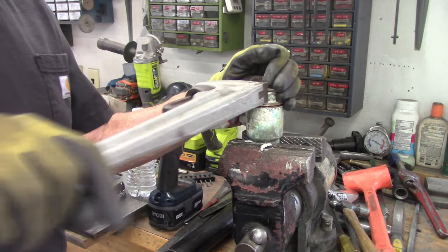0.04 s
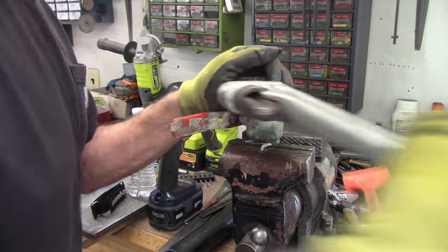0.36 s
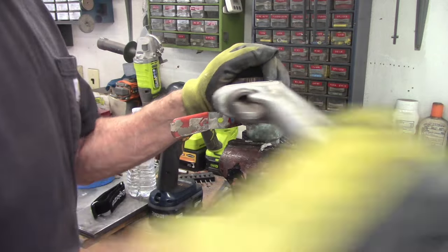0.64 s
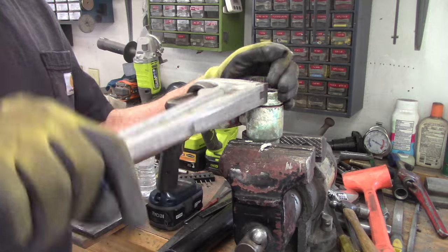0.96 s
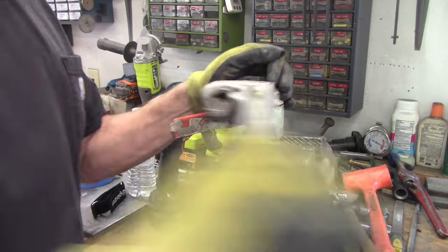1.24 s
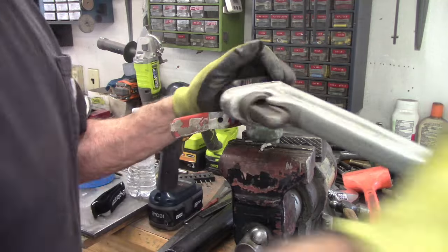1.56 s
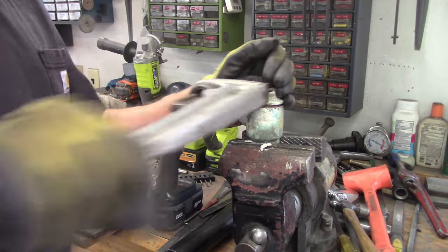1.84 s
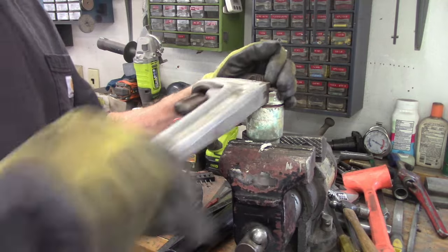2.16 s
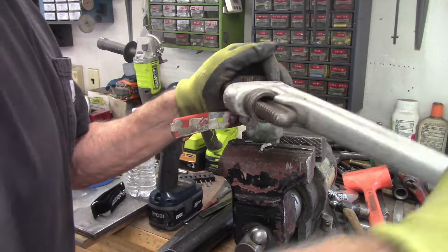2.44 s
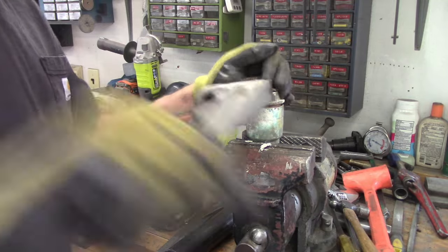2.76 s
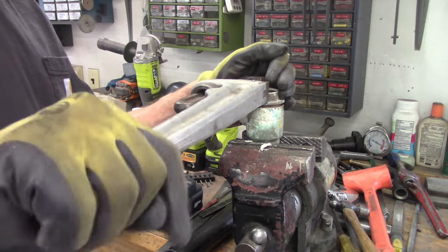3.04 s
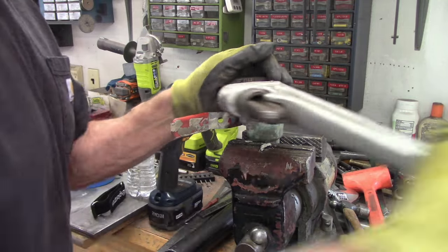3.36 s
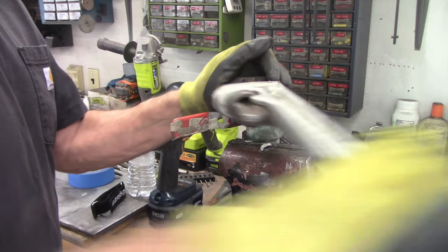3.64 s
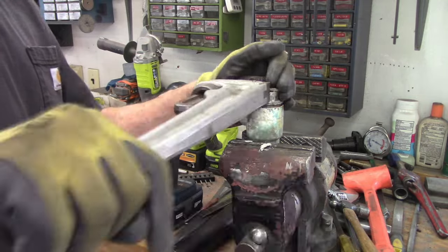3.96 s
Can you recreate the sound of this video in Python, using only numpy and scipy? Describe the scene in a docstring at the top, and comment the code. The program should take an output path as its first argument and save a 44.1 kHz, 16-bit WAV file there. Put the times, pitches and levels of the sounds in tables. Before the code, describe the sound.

A big pipe wrench clanks and rattles on a fitting in a vise, close by. Short grinds lead into clusters of steel clicks, scrapes and bench thuds at about 0.6, 1.7, 2.6 and 3.7 seconds, the second being the loudest. Lighter knocks fall near 0.1, 1.1, 2 and 3 seconds. A sleeve rustles faintly between strokes, and the workshop rings briefly over low room noise.

```python
"""A short grind and a clank, close to the microphone: a big pipe wrench is swung to and fro on a
fitting clamped in a bench vise. At each turn of the stroke its loose jaw clatters: steel clicks,
the vise clanks and the bench thuds just after. Between the blows the fitting grinds and a sleeve
rustles. The workshop rings on behind a closely spaced stereo pair, and a limiter holds the peaks."""
import sys
import numpy as np
from scipy import signal
from scipy.fft import rfft, irfft, next_fast_len
from scipy.io import wavfile
from scipy.ndimage import uniform_filter1d, minimum_filter1d, map_coordinates

SR = 44100
rng = np.random.default_rng(int(sys.argv[2]) if len(sys.argv) > 2 else 0)


def master_out(mix):
    """Clip the mix to full scale and print it as 16-bit PCM to the path in sys.argv[1]."""
    frames = np.transpose(np.atleast_2d(mix))
    ceiling = np.clip(frames, -1, 1)
    pcm = np.round(ceiling * 32767).astype(np.int16)
    wavfile.write(sys.argv[1], SR, pcm)


N = 176400


def amp(db):
    """Decibels to gain."""
    return 10 ** (np.asarray(db) / 20)


def unit(x):
    """Scaled to rms 1."""
    return x / np.sqrt(np.mean(x ** 2) + 1e-20)


def along(points, hz):
    """A curve of (freq_hz, value) points, read on a log frequency axis."""
    freqs, values = np.transpose(points)
    return np.interp(np.log(hz + 1), np.log(freqs + 1), values)


def peak(f, hz, width):
    """Complex response at f of one resonance centred on hz."""
    return 1j * f * width / (hz * hz - f * f + 1j * f * width)


def filtered(x, response):
    """x through a filter given as a function of frequency."""
    n = x.shape[-1]
    padded = next_fast_len(n + n // 4, real=True)
    return irfft(rfft(x, padded) * response(np.fft.rfftfreq(padded, 1 / SR)), padded)[..., :n]


def noise(spectrum):
    """Coloured noise of rms 1."""
    return unit(filtered(rng.standard_normal(N), lambda hz: amp(along(spectrum, hz))))


def wobble(rate):
    """A smooth random curve, rate knots a second."""
    return map_coordinates(rng.standard_normal(int(N * rate / SR) + 4), [np.arange(N) * rate / SR])


def placed(times, levels_db, sounds):
    """One sound at each time and level."""
    out = np.zeros(N + 2 * SR)
    for start_s, db, sound in zip(times, levels_db, sounds):
        out[max(round(start_s * SR), 0):][:len(sound)] += amp(db) * sound
    return out[:N]


# room tone of the workshop: freq_hz, relative_db
ROOM_TONE = [(25, -34), (60, -10), (120, -1), (220, 5), (400, 2.5), (1000, 5), (1500, -4), (2500, -13.5),
             (6000, -25.5), (10000, -32.5), (16000, -40)]
def room_tone(level_db=-42.5):
    """A steady, low wash of noise behind the work."""
    return amp(level_db) * noise(ROOM_TONE)


# decay of the room: freq_hz, t60_s
ROOM_DECAY = [(100, 0.55), (350, 0.78), (1000, 0.61), (2000, 0.99), (4000, 0.7), (7000, 0.5), (12000, 0.1)]
# colour of its long tail: freq_hz, relative_db
ROOM_COLOUR = [(100, -1), (350, 3), (1000, -0.5), (2000, -8.5), (4000, -8), (7000, -15.5), (12000, -9.5)]
def workshop(x, segments=24, near_db=-6, near_t60_s=0.12):
    """Quick scatter off nearby tools and walls, then a long tail, drawn afresh for each short
    stretch of time."""
    out = np.zeros(N + 2 * SR)
    size = N // segments + 1
    for start in range(0, N, size):
        hz, t, hiss = signal.stft(rng.standard_normal(SR + SR // 4), SR, nperseg=256)
        t60 = along(ROOM_DECAY, hz)[:, None]
        late = amp(along(ROOM_COLOUR, hz)[:, None] - 60 * t / t60) / np.sqrt(t60)
        near = amp(near_db - 60 * t / near_t60_s) / np.sqrt(near_t60_s)
        _, tail = signal.istft(hiss * np.hypot(late, near) * (t > 0), SR, nperseg=256)
        tail *= np.sqrt(2 * np.log(1000) / SR)  # a 0 dB decay carries unit energy
        wet = signal.fftconvolve(x[start:start + size], tail)
        out[start:start + len(wet)] += wet
    return out[:N]


# sleeve and glove, near the microphone: time_s, level_db
SLEEVE_LEVELS = [(0, -54.5), (.2, -46), (.4, -58.5), (.85, -59), (.92, -54.5), (1.0, -54.5), (1.12, -61),
                 (1.271, -50.5), (1.35, -58.5), (1.46, -46), (1.5, -69), (1.58, -50), (2.1, -56),
                 (2.271, -49), (2.34, -61), (2.44, -64), (3.0, -60), (3.33, -45.5), (3.42, -60),
                 (3.5, -51.5), (4, -51.5)]
# colour of the cloth: freq_hz, relative_db
CLOTH_SPECTRUM = [(200, 9.5), (1000, 1.5), (3500, 5.5), (7000, 1.5), (9200, -1), (12000, -10.5),
                  (16000, -24)]
def sleeve_rustle():
    """Cloth brushes and crackles with the swing of the arm."""
    motion = amp(np.interp(np.arange(N) / SR, *np.transpose(SLEEVE_LEVELS)))
    return motion * unit(noise(CLOTH_SPECTRUM) * amp(2.0 * wobble(41) + 3.5 * wobble(400)))


def gate(start_s, end_s, fade_s):
    """Fades in from start_s and out from end_s."""
    t = np.arange(N) / SR
    return np.clip((t - start_s) / fade_s, 0, 1) * np.clip(1 - (t - end_s) / fade_s, 0, 1)


# the jaw slips on the fitting: start_s, end_s, scrape_db, singing_db
TOOTH_SLIPS = [(0.13, 0.263, -53, -60), (0.638, .72, -29.5, -50), (1.674, 1.783, -33, -48),
               (2.612, 2.696, -33, -45), (3.69, 3.794, -37, -46)]
# steel scraping steel: freq_hz, relative_db
SCRAPE_SPECTRUM = [(700, -12), (2000, 14), (3200, 8), (5000, -1), (7000, -15), (9300, -24.5), (11000, -28),
                   (13000, -31), (16000, -42)]
def slipping_teeth(grit_db=8, pitch_hz=9300, width_hz=600):
    """The teeth catch unevenly, scraping and singing as they let go."""
    scrape = unit(noise(SCRAPE_SPECTRUM) * amp(grit_db * wobble(700)))
    friction = rng.standard_normal(N) * amp(8.6 * wobble(70))
    singing = unit(filtered(friction, lambda f: peak(f, pitch_hz, width_hz) ** 2))
    return sum(gate(start, end, fade_s=0.0067) * (amp(scrape_db) * scrape + amp(singing_db) * singing)
               for start, end, scrape_db, singing_db in TOOTH_SLIPS)


# turns of the fitting in the vise: start_s, end_s, end_level_db
FITTING_TURNS = [(-.1, 0.08, -34.5), (0.464, 0.626, -30), (0.92, 1.096, -34), (1.501, 1.627, -27),
                 (1.974, 2.013, -27), (2.449, 2.621, -22.5), (3.594, 3.714, -22.5)]
# colour of the grinding: freq_hz, relative_db
GRIND_SPECTRUM = [(60, -51), (150, -5), (330, 10.5), (450, 7), (650, 0), (1050, 0.5), (1500, -13.5),
                  (3000, -24), (9000, -33), (16000, -70)]
def grinding_fitting(rise_db=9.5):
    """The fitting slips in uneven jerks, louder as the stroke gathers speed."""
    t = np.arange(N) / SR
    effort = np.zeros(N)
    for start, end, end_db in FITTING_TURNS:
        remaining = np.clip((end - t) / (end - start), 0, 1)
        effort += amp(end_db - rise_db * remaining) * gate(start, end, fade_s=0.045)
    return effort * unit(noise(GRIND_SPECTRUM) * amp(2.7 * wobble(110)))


def struck(times, levels_db, modes, band_hz, swell_s, t60_s, gain_db, room_db, favoured_hz=None):
    """Each blow is a burst of chatter through a part's resonances. Rows: direct sound, room feed."""
    def body(f):
        return sum((-1) ** k * amp(db) * peak(f, hz, width) for k, (hz, width, db) in enumerate(modes))

    def all_round(f):
        """The room hears the part from all sides, so its resonances seem twice as wide."""
        return np.sqrt(sum(np.abs(amp(db) * peak(f, hz, 2 * width)) ** 2 for hz, width, db in modes))

    def contact(f):
        """The point of contact brings out one region of the part's spectrum."""
        if favoured_hz is None:
            return np.ones((len(times), 1))
        hz = favoured_hz[:, None]
        return 1 + amp(6.5) * peak(f, hz, width=0.17 * hz)

    t = np.arange(SR // 6) / SR
    envelope = (1 - np.exp(-(t / swell_s) ** 2)) * amp(-60 * t / t60_s)
    chatter = rng.choice([-1., 1.], (len(times), len(t))) * envelope
    direct = filtered(chatter, lambda f: body(f) * contact(f))
    impulse = signal.unit_impulse(len(t), round(swell_s * SR) + 32)
    radiated = filtered(impulse, lambda f: all_round(f) * np.sqrt(np.abs(contact(f))))
    bandpass = signal.butter(3, band_hz, "band", fs=SR, output="sos")
    blows = signal.sosfilt(bandpass, np.array([direct, radiated]))
    energy = np.sum(blows ** 2, axis=2, keepdims=True) / (SR / 100)  # against 10 ms at rms 1
    direct, radiated = blows / np.sqrt(energy)
    return np.array([placed(times, levels_db + gain_db, direct),
                     placed(times, levels_db + gain_db + room_db, radiated)])


def steel_ring(times, levels_db, partials, t60_s, gain_db, blur_hz=38):
    """Each contact leaves a faint, unsteady ring, heard only close by: its room feed is silent."""
    t = np.arange(SR) / SR
    hz, db = np.transpose(partials)
    drift = np.cumsum(rng.standard_normal((len(hz), SR)), axis=1) * np.sqrt(2 * np.pi * blur_hz / SR)
    drift = uniform_filter1d(drift, size=200, axis=1)
    modes = np.sin(2 * np.pi * hz[:, None] * t + drift) * amp(db[:, None] - 60 * t / t60_s)
    shares = rng.standard_normal((len(times), len(hz)))
    return np.array([placed(times, levels_db + gain_db, shares @ modes), np.zeros(N)])


# heavy contacts, with levels before each part's gain and the pitches that the contact favours:
# start_s, click_db, jaw_db, vise_db, bench_db, vise_hz, bench_hz, jaw_hz
HEAVY_KNOCKS = [(0.0696, -35, -39, -23, -17.5, 694, 604, 2820),
                (0.606, -23, -25, -14, -12.5, 1500, 377, 2110),
                (0.659, -16, -12, -9.5, -15.5, 1600, 560, 2800),
                (0.6806, -14.5, -14, -16, -8, 635, 370, 3000),
                (0.7315, -20, -21.5, -10, -16.5, 910, 320, 2910),
                (1.0803, -27, -17.5, -26, -24, 1920, 700, 3760),
                (1.0945, -30, -43, -21.5, -19.5, 715, 386, 2830),
                (1.657, -8.5, -12, -12, -13.5, 1180, 433, 4930),
                (1.691, -5.5, -15, -4, -13, 1890, 430, 6200), (1.728, -6, -10, -8.5, -8.5, 1020, 402, 2760),
                (1.7686, -22, -25, -10.5, -17.5, 840, 463, 3630),
                (1.8561, -9, -16, -9, -14, 1000, 394, 3720),
                (2.0354, -30, -31.5, -24.5, -19, 1570, 386, 2880),
                (2.056, -33, -33, -19.5, -17, 720, 424, 2300),
                (2.532, -29, -45.5, -26.5, -23, 988, 445, 2800),
                (2.629, -11.5, -15, -15.5, -12, 1570, 370, 2290),
                (2.6507, -6.5, -16.5, -9.5, -11, 1100, 393, 4260),
                (2.6885, -13.5, -23.5, -10, -9, 1130, 412, 2610),
                (2.7342, -35, -34, -22, -14.5, 1090, 323, 2800),
                (3.029, -29, -24, -18, -13.5, 970, 460, 2420),
                (3.53, -22.5, -24, -15, -16, 1090, 394, 2900),
                (3.56, -22, -29, -20, -20.5, 1210, 374, 3000),
                (3.5815, -25, -33.5, -16.5, -12, 1170, 386, 4750),
                (3.6248, -33, -34.5, -13.5, -13.5, 1100, 380, 3240),
                (3.6623, -52, -36, -22.5, -15, 646, 330, 2320),
                (3.7058, -18, -17, -9, -10.5, 740, 422, 2870),
                (3.738, -21, -17, -8.5, -12.5, 1100, 415, 2600),
                (3.7547, -3, -14.5, -9.5, -21.5, 995, 437, 5740),
                (3.7915, -29, -31, -13, -16.5, 1170, 485, 3300),
                (3.8213, -26.5, -31.5, -26, -22, 950, 370, 3300)]
# light taps of the loose jaw, before trim and gain: start_s, click_db, jaw_db, vise_db
LIGHT_TAPS = [(0.056, -38, -30.5, -19.5), (0.0932, -23, -33, -28), (0.4953, -27.5, -24, -22.5),
              (0.533, -31.5, -51, -24.5), (0.628, -29, -24, -11), (1.058, -29, -36, -28),
              (1.526, -52, -39, -37), (1.608, -28, -40, -19.5), (1.8275, -17.5, -14, -9.5),
              (2.454, -42, -43, -24), (2.494, -26.5, -39, -27), (2.583, -34, -34, -22),
              (2.5978, -19, -27.5, -13.5), (2.6416, -26, -34, -3.5), (2.7204, -26, -43, -9),
              (2.7737, -33, -17.5, -15), (2.9224, -23.5, -25, -16.5), (3.2646, -34, -37, -22.5),
              (3.4735, -35.5, -48, -30), (3.6072, -33, -41, -16), (3.6952, -29, -32, -9),
              (3.9455, -32, -38.5, -28.5)]
# resonances, from the steel down to the bench's slow shake: pitch_hz, width_hz, relative_db
CRACK_MODES = [(14000, 4000, 0)]
CLICK_MODES = [(6970, 510, 2), (7940, 1100, 4.5), (9450, 500, 3), (10630, 420, -3.5), (12130, 240, 2),
               (10730, 330, -36)]
JAW_MODES = [(2140, 690, 2), (2775, 138, 9), (2968, 64, 7.5), (3505, 430, 8), (4790, 560, 4),
             (5280, 290, 5), (5450, 450, -0.5), (6170, 230, 5.5)]
VISE_MODES = [(762.4, 31.4, 4), (836, 18, -9), (990, 33.3, 4), (1136, 72, -1.5), (1280, 234, -9.5),
              (1375, 46, -2), (1561, 53, -0.5), (1825, 175, -4.5), (2116, 350, -13)]
BENCH_MODES = [(143, 21, -5), (205, 32, -11.5), (306, 38, 2), (367, 34, 1), (408.5, 47, 0), (494.5, 34, -4),
               (631, 32.5, 0)]
SHAKE_MODES = [(45, 30, -10), (72, 25, -6), (135, 50, 10)]
# long ring of the steel, with close pairs that beat: pitch_hz, relative_db
STEEL_PARTIALS = [(1430, -7), (1595, -3), (1803, -3), (2584, -8), (2885, -5), (3564, 1), (3634, -1),
                  (4264, -8), (4990, -8), (5150, -12)]
# short, high ping of the teeth: pitch_hz, relative_db
PING_PARTIALS = [(6164, 0), (9469, 1), (11400, -2)]
def wrench(tap_trim_db=-5, tap_vise_trim_db=-7):
    """Close up, each contact cracks, clicks and rings the jaw; the heavy vise and bench answer later."""
    knock_s, knock_click, knock_jaw, vise_db, bench_db, *favoured = np.transpose(HEAVY_KNOCKS)
    vise_hz, bench_hz, jaw_hz = favoured
    tap_s, tap_click, tap_jaw, tap_vise = np.transpose(LIGHT_TAPS)
    times = np.r_[knock_s, tap_s]
    click_db = np.r_[knock_click, tap_click + tap_trim_db]
    jaw_db = np.r_[knock_jaw, tap_jaw + tap_trim_db]
    click = struck(times, click_db, CLICK_MODES, band_hz=(5700, 13200), swell_s=0.00036, t60_s=0.024,
                   gain_db=-15, room_db=-7, favoured_hz=rng.uniform(7770, 11560, len(times)))
    jaw_hz = np.r_[jaw_hz, rng.uniform(2870, 4320, len(tap_s))]
    jaw = struck(times, jaw_db, JAW_MODES, band_hz=(2010, 8450), swell_s=0.00039, t60_s=0.033,
                 gain_db=-3.5, room_db=-1.5, favoured_hz=jaw_hz)
    crack = struck(times, (click_db + jaw_db) / 2, CRACK_MODES, band_hz=(11100, 15900),
                   swell_s=0.00011, t60_s=0.024, gain_db=-35.5, room_db=-14)
    clank = struck(knock_s, vise_db, VISE_MODES, band_hz=(703, 2740), swell_s=0.00347, t60_s=0.024,
                   gain_db=-1.5, room_db=-1.5, favoured_hz=vise_hz)
    clink = struck(tap_s, tap_vise + tap_vise_trim_db, VISE_MODES, band_hz=(640, 2540),
                   swell_s=0.00121, t60_s=0.037, gain_db=-6.5, room_db=2)
    thud = struck(knock_s, bench_db, BENCH_MODES, band_hz=(151, 860), swell_s=0.006283, t60_s=0.057,
                  gain_db=1.5, room_db=-2, favoured_hz=bench_hz)
    shake = struck(knock_s, bench_db, SHAKE_MODES, band_hz=(38, 179), swell_s=0.012, t60_s=0.16,
                   gain_db=-24.5, room_db=-5)
    ring = steel_ring(times, jaw_db, STEEL_PARTIALS, t60_s=0.8, gain_db=-28.5)
    ping = steel_ring(times, click_db, PING_PARTIALS, t60_s=0.17, gain_db=-33)
    return click + jaw + crack + clank + clink + thud + shake + ring + ping


# stereo width at the microphones: freq_hz, side_over_mid_db
PAIR_WIDTH = [(30, -13), (130, -29.5), (1000, -35), (4000, -24), (9000, -23.5), (13000, -16)]
# their self-noise: freq_hz, relative_db
MIC_HISS = [(25, -12), (60, -4), (150, -6), (500, -3), (2000, -18), (8000, -26), (16000, -30)]
def microphone_pair(mid, hiss_db=-64):
    """Two closely spaced microphones hear nearly the same sound, slightly apart in phase."""
    side = filtered(mid, lambda hz: 1j * amp(along(PAIR_WIDTH, hz))) + amp(hiss_db) * noise(MIC_HISS)
    return np.array([mid + side, mid - side])


def scene():
    """The bench stands close and straight ahead of the microphones, with the workshop behind it."""
    direct, radiated = wrench() + slipping_teeth() + grinding_fitting() + sleeve_rustle()
    return microphone_pair(direct + workshop(radiated) + room_tone())


def record(dry):
    """The recorder's fast limiter holds the peaks, then the highest treble is cut off."""
    ceiling, hold_s, top_hz = 0.95, 0.003, 15900
    hold = int(hold_s * SR)
    needed = ceiling / np.maximum(np.abs(dry).max(axis=0), ceiling)
    gain = uniform_filter1d(minimum_filter1d(needed, hold), hold)
    return filtered(dry * gain, lambda hz: hz < top_hz)


dry = scene()
out = record(dry)
master_out(out)
```